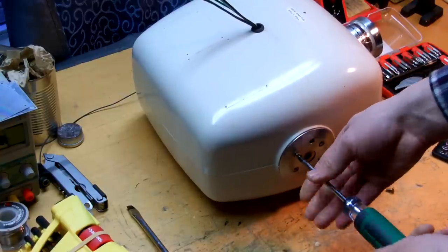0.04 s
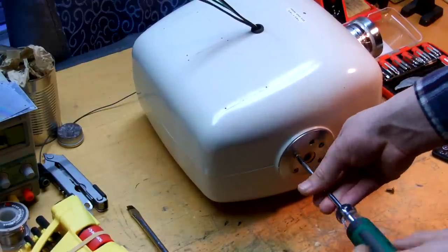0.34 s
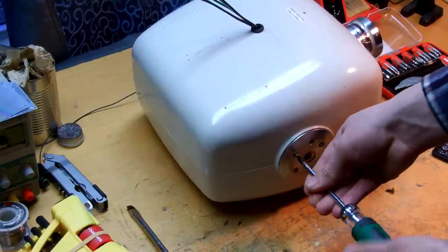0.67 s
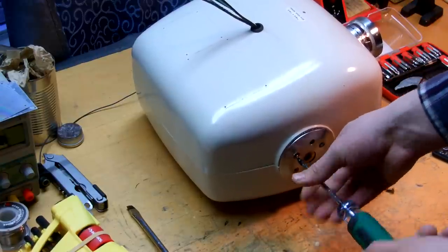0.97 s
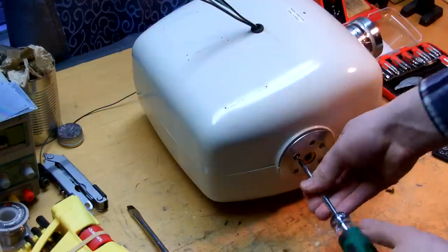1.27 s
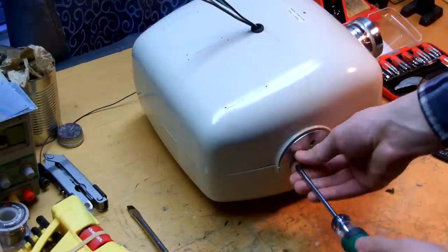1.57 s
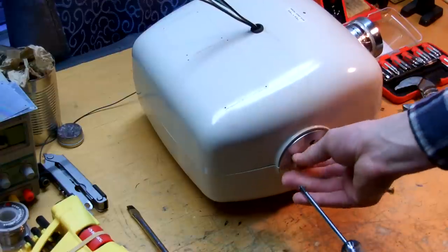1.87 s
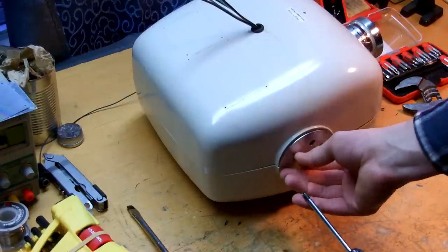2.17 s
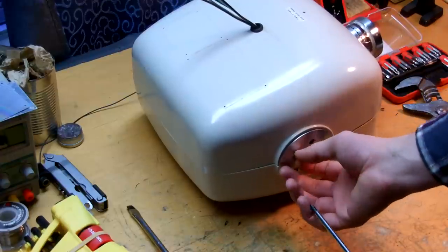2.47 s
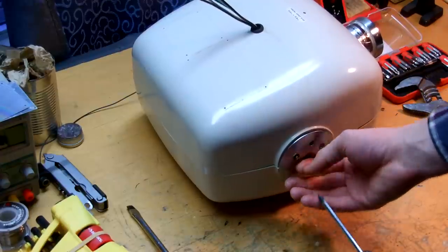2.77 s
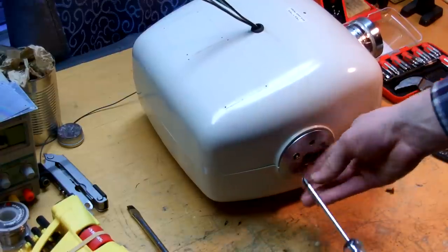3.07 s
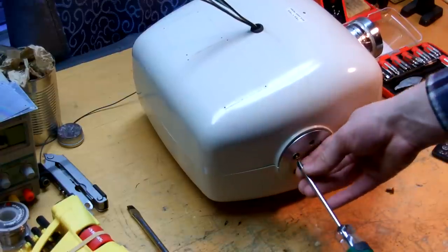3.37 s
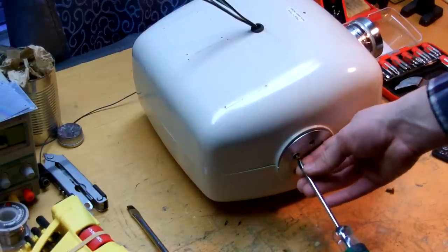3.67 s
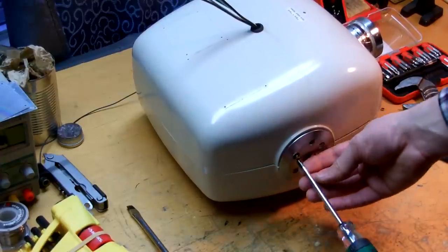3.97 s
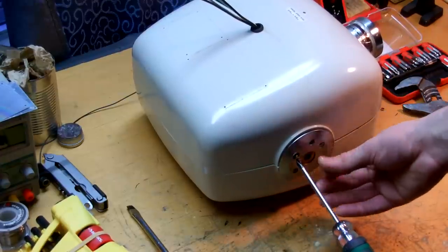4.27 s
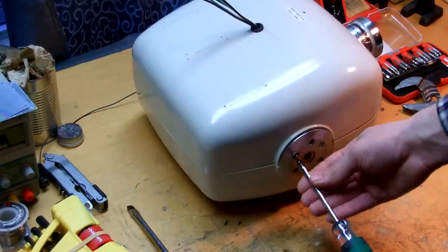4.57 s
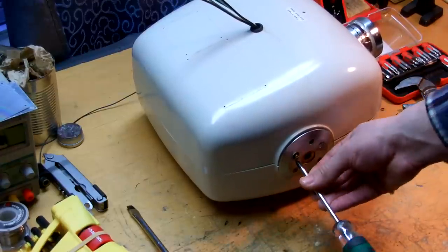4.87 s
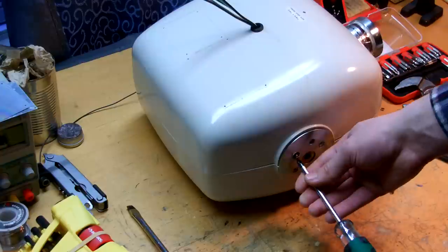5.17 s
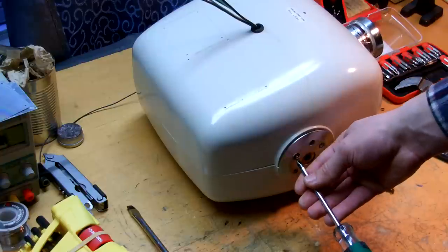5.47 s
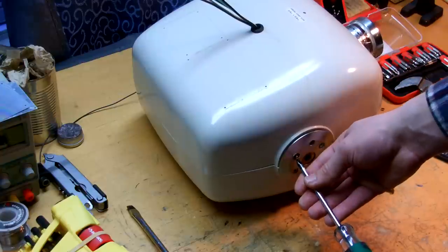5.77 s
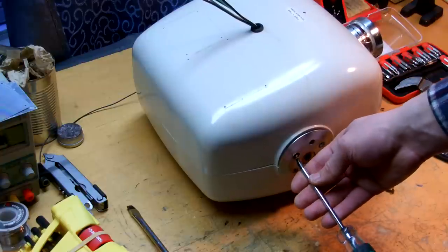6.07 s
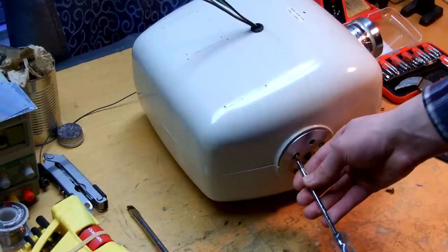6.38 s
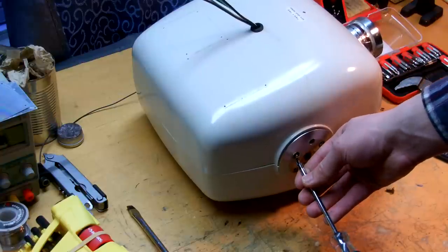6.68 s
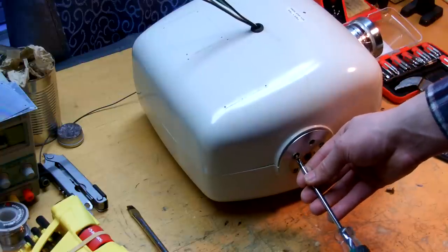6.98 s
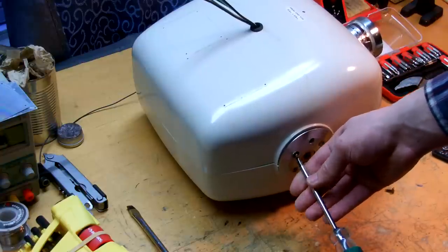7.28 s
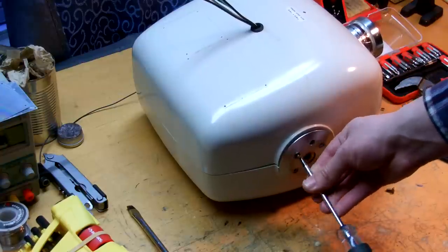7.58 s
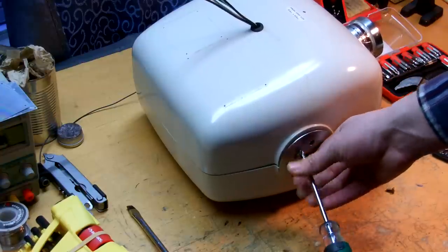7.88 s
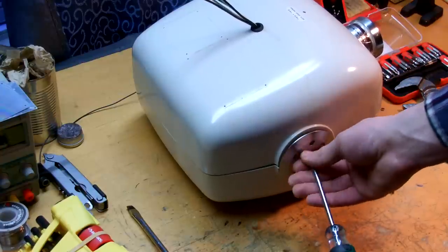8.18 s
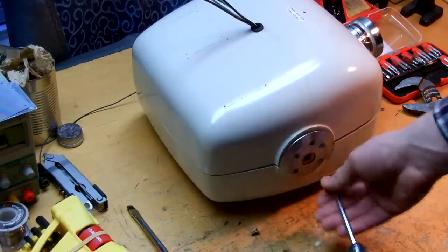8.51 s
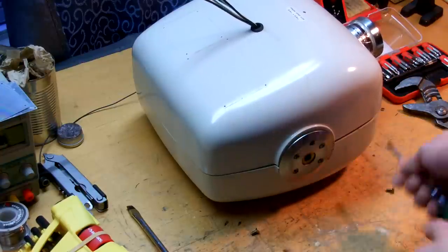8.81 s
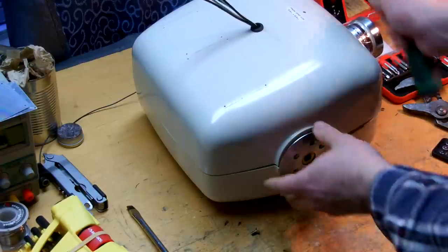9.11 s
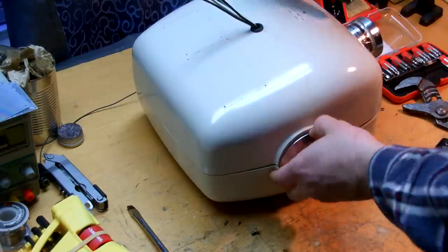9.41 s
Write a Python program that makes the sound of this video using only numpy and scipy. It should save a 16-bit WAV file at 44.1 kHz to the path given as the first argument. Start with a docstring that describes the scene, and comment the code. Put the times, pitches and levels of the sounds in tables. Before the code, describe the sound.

A hand screwdriver works small screws out of a metal plate on a hollow plastic housing, heard close in a small room with faint hiss. From about 0.5 seconds the blade rattles and knocks in the screw head, each contact sounding through the shell, with strong knocks near 1 and 1.4 seconds and brief squeaks from the thread. A quieter stretch from 2 to 3.3 seconds holds a few light metal chinks and a knock. Uneven clicks, knocks and short grating scrapes resume at 3.5 seconds, loudest near 4.5. The bench thuds dully at 6 seconds. More scraping and knocking runs from 7 to 8 seconds, ending in a thin metallic squeak. At 8.3 seconds a freed screw drops on the bench and bounces several times with bright clicks. Soft thuds and faint sleeve brushes follow, then a few last hollow knocks between 9.2 and 9.6 seconds.

```python
"""A hand screwdriver backs small screws out of a metal flange on a hollow plastic housing on a workbench.
In the hiss of a small quiet room a sleeve brushes by and the bench thuds dully. The blade rattles and
knocks in the screw heads, the thread squeaks and grates by stick-slip, and the housing booms with each
contact. From 2.2 s the shaft chinks on the flange a few times. The turning goes on until a freed screw
bounces on the bench at 8.3 s; dull thuds, brushes and a few last knocks follow."""
import sys
import numpy as np
from scipy import signal
from scipy.fft import rfft, irfft, next_fast_len
from scipy.io import wavfile

SR = 44100
rng = np.random.default_rng(int(sys.argv[2]) if len(sys.argv) > 2 else 0)


def materialize(psi):
    """Save the field psi as 16-bit PCM at rate SR to the path in sys.argv[1].

    A 1-D psi becomes a single channel; in a 2-D psi each row is a channel.
    """
    bounded = np.clip(np.atleast_2d(psi).T, -1, 1)
    quanta = np.round(bounded * 32767).astype(np.int16)
    wavfile.write(sys.argv[1], SR, quanta)


N = 425565
RING_S = np.arange(SR // 4) / SR  # time axis of one ring

# Steel shaft modes. Each row: frequency in Hz, relative level in dB, t60 in seconds.
SHAFT_MODES = [(4790, -3.5, 0.057), (7980, -4, 0.033), (8620, -3.5, 0.041), (13600, -8, 0.077)]
# Stereo width. Each row: frequency in Hz, side against mid in dB.
STEREO_WIDTH = [(100, -31), (300, -30), (1200, -18), (2400, -10.5), (4500, -9), (9000, -4), (15000, 0)]


def undb(db):
    """Decibels to gain."""
    return 10 ** (np.asarray(db) / 20)


def unit(x):
    """Scale to a mean energy of one per channel."""
    return x / np.sqrt(np.mean(np.sum(x ** 2, axis=-1)))


def fade(t60_s):
    """Exponential decay of a ring."""
    return np.exp(-np.log(1000) * RING_S / t60_s)


def colour(x, points):
    """Minimum-phase filter through (Hz, dB) points."""
    size = next_fast_len(x.shape[-1] // 2 + 2048) * 2
    hz, db = np.transpose(points)
    bin_hz = np.arange(size // 2 + 1) * SR / size
    gain = undb(np.interp(np.log(bin_hz + 1), np.log(hz), db))
    cepstrum = irfft(np.log(gain))
    cepstrum[1:size // 2] *= 2
    cepstrum[size // 2 + 1:] = 0
    return irfft(rfft(x, size) * np.exp(rfft(cepstrum)), size)[..., :x.shape[-1]]


def diffuse(count, width):
    """Stereo noise, wider towards the treble."""
    mid, side = rng.standard_normal((2, count))
    return mid + np.array([[1], [-1]]) * colour(side, width)


def butter(x, hz, kind="low", order=2):
    """Butterworth low-pass or high-pass."""
    return signal.sosfilt(signal.butter(order, min(hz, SR / 3), kind, fs=SR, output="sos"), x)


def add(out, start_s, sound):
    """Mix a sound in at start_s."""
    start = int(start_s * SR)
    out[:, start:start + sound.shape[1]] += sound[:, :N - start]


def modes(table, scatter_db, detune):
    """Decaying sines, weighted anew by each contact point."""
    hz, db, t60_s = np.transpose(table)[:, :, None]
    size, shift = rng.standard_normal((2, len(table), 1))
    sign = (-1) ** np.arange(len(table))[:, None]  # alternating signs let the ring build up
    sines = np.sin(2 * np.pi * hz * (1 + detune * shift) * RING_S)
    return unit(np.sum(sign * undb(db + scatter_db * size) * fade(t60_s) * sines, axis=0))


def cloud(t60_s):
    """Modes or reflections too dense to tell apart."""
    return unit(diffuse(len(RING_S), STEREO_WIDTH) * fade(t60_s))


def excite(response, slips):
    """A slip train played through a ring, at unit energy."""
    return unit(signal.fftconvolve(np.atleast_2d(response), slips[None], axes=1))


def room_tone(noise_db=-68.5, hum_hz=53, hum_db=-88):
    """Steady hiss over a faint rumble and hum."""
    # Each row: frequency in Hz, relative level in dB.
    spectrum = [(20, -24), (50, -5), (120, -11.5), (300, -1), (650, 1), (1200, -2.5), (2500, -5),
                (6000, -7.5), (15000, -8.5)]
    # Each row: frequency in Hz, side against mid in dB.
    width = [(60, -3.5), (200, -5), (1000, -1), (4000, 0)]
    noise = colour(diffuse(N, width), spectrum)
    hum = undb(hum_db) * np.sin(2 * np.pi * hum_hz * np.arange(N) / SR)
    return noise * undb(noise_db) / np.std(noise.mean(axis=0)) + hum


def brushes(grain_db=1.0):
    """Sleeve and skin slide in soft, grainy swells."""
    # Each row: centre in seconds, half length in seconds, level in dB.
    strokes = [(0.55, 0.62, -72), (2.97, 0.28, -72), (6.04, 0.091, -68.5), (7.47, 0.25, -69.5),
               (8.946, 0.1, -64.5), (9.418, 0.24, -69.5)]
    # Each row: frequency in Hz, relative level in dB.
    cloth_spectrum = [(100, -16), (500, 4.5), (1400, 0), (3000, -8.5), (7000, -11), (11000, -7),
                      (16000, -17)]
    t = np.arange(N) / SR
    swell = sum(undb(db) * np.exp(-((t - centre_s) / half_s) ** 2) for centre_s, half_s, db in strokes)
    grain = np.interp(t, np.linspace(0, t[-1], N // 256), rng.standard_normal(N // 256))
    friction = np.sqrt(N) * unit(colour(diffuse(N, STEREO_WIDTH), cloth_spectrum))
    return friction * swell * undb(-grain_db * grain)


def bench_thuds():
    """Low, dull thuds of the bench, some under hard knocks, some on their own."""
    # Each row: start in seconds, energy in dB, cut-off in Hz.
    thuds = [(0.043, -42, 246), (0.974, -40, 99), (1.406, -48, 100), (5.956, -31, 287), (5.99, -31.5, 85),
             (8.673, -35, 294), (8.936, -45.5, 179)]
    out = np.zeros((2, N))
    for start_s, db, cutoff_hz in thuds:
        thud = butter(cloud(t60_s=0.26) * (1 - fade(t60_s=0.026)), cutoff_hz, order=4)
        add(out, start_s, undb(db) * unit(butter(thud, 40, "high")))
    return out


def housing(cutoff_hz):
    """Hollow shell: clear low modes, a clack of dense upper ones, the room; soft contacts lack the top."""
    # Each row: frequency in Hz, relative level in dB, t60 in seconds.
    shell_modes = [(244.8, -28.5, 0.18), (301.7, -16, 0.12), (360.3, -19, 0.13), (399, -19.5, 0.16),
                   (446, -13.5, 0.083), (488, -15.0, 0.14), (514.4, -15.5, 0.088), (571, -24, 0.17),
                   (623, -11.5, 0.052), (697.2, -7.5, 0.11), (744, -15, 0.17), (836, -19.5, 0.14),
                   (907.4, -22, 0.18), (972.3, -11.5, 0.12), (1060, -9, 0.031), (1092, -14.5, 0.1),
                   (1231, -8.5, 0.052), (1268, -21.5, 0.069), (1298, -7, 0.071), (1390, -8, 0.08),
                   (1497, -18.5, 0.038), (1690, -7.5, 0.058), (1814, -9, 0.055), (2073, -7.5, 0.056),
                   (2184, -2, 0.053), (2552, -8.5, 0.1), (2800, -16.5, 0.11)]
    # Each row: frequency in Hz, relative level in dB.
    dense_spectrum = [(60, -35.5), (120, -36), (190, -24.5), (300, -14.5), (800, -9), (1300, -1), (1800, 1),
                      (2800, -1), (3900, -7.5), (7000, -11), (16000, -25)]
    clear = butter(modes(shell_modes, scatter_db=2.5, detune=0.003), 230, "high", order=4)
    clack = unit(cloud(t60_s=0.044) * (1 - fade(t60_s=0.011)))  # the blow takes a moment to spread
    room = undb(1) * cloud(t60_s=0.16)
    dense = unit(colour(clack + room, dense_spectrum))
    return butter(undb(-3) * clear + undb(1) * dense, cutoff_hz)


def steel():
    """Blade on screw head: a crack, a brief chatter, the room and the ringing shaft."""
    # Each row: frequency in Hz, relative level in dB.
    tick_spectrum = [(300, -24.5), (1200, -8.5), (3000, -4), (5200, 3.5), (7500, 0), (9000, 0.5),
                     (10500, -1), (13500, -0.5), (16000, -4)]
    crack = undb(-14) * (RING_S == 0)
    chatter = cloud(t60_s=0.029)
    room = undb(-8.5) * cloud(t60_s=0.17)
    tick = unit(colour(crack + chatter + room, tick_spectrum))
    return tick + undb(-11) * modes(SHAFT_MODES, scatter_db=1.5, detune=0.0099)


def contact(shell_db, steel_db, base_hz=2872, steel_db_per_octave=14.5, force_db_per_octave=47):
    """Housing and steel sound together; a stronger or steelier contact is shorter, so brighter."""
    hardness_db = min(steel_db - shell_db, -13)  # no harder beyond this share of steel
    octaves = hardness_db / steel_db_per_octave + shell_db / force_db_per_octave
    return undb(shell_db) * housing(base_hz * 2 ** octaves) + undb(steel_db) * steel()


def rattles(rate_hz=41, scatter_db=3.5):
    """The blade rattles unevenly in its slot while the fingers spin the shaft."""
    # Each row: start in seconds, end in seconds, mean housing level in dB.
    spins = [(0.495, 0.58, -28.5), (5.497, 5.66, -35.5), (6.098, 6.4, -37), (7.404, 7.57, -23)]
    out = np.zeros((2, N))
    for start_s, end_s, db in spins:
        for step_s in np.arange(start_s, end_s, 1 / rate_hz):
            shell_db = db + scatter_db * rng.standard_normal()
            add(out, step_s + rng.random() / rate_hz, contact(shell_db, steel_db=shell_db - 25))
    return out


def grate(length_s, shell_db, steel_db, slip_hz=420, scatter_db=6):
    """Stick-slip: an uneven run of tiny contacts that swells and dies."""
    count = max(int(length_s * slip_hz), 3)
    jitter, size = rng.standard_normal((2, 256))[:, :count]
    sign = rng.choice([-1, 1], 256)[:count]
    progress = (np.arange(count) + 0.5 + np.tanh(jitter) / 2) / count
    slips = np.zeros(int(length_s * SR) + 1)
    slips[(progress * length_s * SR).astype(int)] = np.sin(np.pi * progress) * undb(scatter_db * size) * sign
    return signal.fftconvolve(contact(shell_db, steel_db), unit(slips)[None])


def knocks(lead_s=0.018):
    """The blade grates up the side of its slot, then drops back in."""
    # Each row: impact time in seconds, housing level in dB, steel level in dB.
    impacts = [(0.585, -6, -20), (0.635, -4.5, -39), (0.9709, 8, 0.5), (0.992, 3.5, -15.5),
               (1.0722, 1, -33.5), (1.131, -4, -27.5), (1.2545, -3, -23), (1.3342, -13.5, -29),
               (1.3713, -6, -39.5), (1.4068, 7, -9), (2.035, -31.5, -40), (2.8031, -25.5, -18),
               (2.806, -9, -40.5), (2.974, -16, -59), (3.4602, -6, -30), (3.481, -13, -45),
               (3.602, -4, -28.5), (3.705, -14.5, -52.5), (3.744, -14, -40), (3.768, -18, -35.5),
               (4.0949, -5, -21), (4.194, 3.5, -17.5), (4.474, 9.5, -7), (4.628, -8.5, -15.5),
               (4.654, -11.5, -32.5), (4.919, -24.5, -44), (5.219, -7.5, -11.5), (5.353, -30, -40),
               (5.476, -19, -34.5), (5.5238, -14, -43.5), (5.683, -3.5, -22), (6.2374, -27.5, -43),
               (6.408, -20.5, -47), (6.615, -44, -36), (7.01, 5.5, -32), (7.3425, -25.5, -14),
               (7.602, -4.5, -25), (7.693, 0, -23.5), (7.733, -11, -37), (7.8344, 8.5, -9.5),
               (8.033, -21, -32), (9.249, -18.5, -34), (9.272, -5.5, -36.5), (9.483, -9.5, -46),
               (9.5626, -5.5, -45.5), (9.607, -2.5, -45.5)]
    out = np.zeros((2, N))
    for impact_s, shell_db, steel_db in impacts:
        lead_db = shell_db - 15
        add(out, impact_s - lead_s, grate(length_s=0.023, shell_db=lead_db, steel_db=lead_db - 25.5))
        add(out, impact_s, contact(shell_db, steel_db))
    return out


def squeaks(roughness=0.053, scatter_db=3.5):
    """The thread's slips fall into step, sing in the housing and keep the shaft ringing."""
    # Each row: start in seconds, length in seconds, slip rate in Hz, housing and shaft energies in dB.
    slip_runs = [(0.585, 0.09, 709.5, -18.5, -36), (1.366, 0.1, 1000, -15.5, -30),
                 (1.472, 0.063, 661.5, -11, -35), (5.255, 0.03, 498.5, -16, -42),
                 (7.68, 0.015, 689, -12, -33), (8.042, 0.055, 721, -20.5, -19.5),
                 (8.15, 0.014, 488, -30, -58), (8.785, 0.073, 558, -38, -54)]
    out = np.zeros((2, N))
    for start_s, length_s, slip_hz, shell_db, shaft_db in slip_runs:
        jitter, size = rng.standard_normal((2, 128))
        times_s = np.cumsum(np.abs(1 + roughness * jitter)) / slip_hz
        force = np.sin(np.pi * times_s / length_s) * undb(scatter_db * size)
        inside = times_s < length_s
        slips = np.zeros(int(length_s * SR) + 1)
        slips[(times_s[inside] * SR).astype(int)] = force[inside]
        shaft = excite(modes(SHAFT_MODES, scatter_db=12, detune=0.0055), slips)
        shell = excite(housing(cutoff_hz=605), slips)
        add(out, start_s, undb(shell_db) * shell + undb(shaft_db) * shaft)
    return out


def scrapes():
    """The thread grates as the screw turns."""
    # Each row: start in seconds, length in seconds, housing level in dB, steel level in dB.
    turns = [(0.64, 0.04, -11, -41), (1.464, 0.044, -11.5, -29), (3.573, 0.03, -6, -34),
             (4.687, 0.099, -12, -32.5), (5.236, 0.054, -3.5, -29.5), (5.388, 0.072, -13.5, -32.5),
             (6.964, 0.069, -12, -36), (7.19, 0.27, -14.5, -55), (7.548, 0.13, -7, -36),
             (7.717, 0.095, -13, -39), (8.045, 0.038, -17, -12), (9.577, 0.024, -24, -25.5)]
    out = np.zeros((2, N))
    for start_s, length_s, shell_db, steel_db in turns:
        add(out, start_s, grate(length_s, shell_db, steel_db))
    return out


def chinks():
    """Light touches of the shaft ring the small metal flange."""
    # Each row: start in seconds, energy in dB.
    touches = [(2.212, -39), (2.801, -26.5), (2.884, -43), (3.153, -45)]
    # Each row: frequency in Hz, relative level in dB, t60 in seconds.
    flange_modes = [(2280, -5, 0.034), (2844, 6.5, 0.036), (3100, -2, 0.035), (3500, 0, 0.022)]
    out = np.zeros((2, N))
    for start_s, db in touches:
        add(out, start_s, undb(db) * modes(flange_modes, scatter_db=-6.5, detune=0.0194)[None])
    return out


def falling_screw():
    """Each bounce is a hard click, a short rap of the bench top and the room's answer."""
    # Each row: start in seconds, level in dB.
    bounces = [(8.261, -1), (8.3316, -8), (8.3808, -15), (8.4016, -21), (8.422, -39), (8.494, -22.5),
               (8.5148, -29)]
    # Each row: frequency in Hz, relative level in dB.
    spectrum = [(200, -38), (600, -12), (1500, -3), (2400, 1), (4000, -1.5), (6000, 2), (7800, 3),
                (9300, 7), (10600, 5), (12000, 0.5), (13500, -5), (16000, -22)]
    out = np.zeros((2, N))
    for start_s, db in bounces:
        click = unit(colour(undb(5) * (RING_S == 0) + cloud(t60_s=0.0055), spectrum))
        bench = cloud(t60_s=0.071)
        room = undb(-7) * cloud(t60_s=0.2)
        rap = unit(butter(colour(bench + room, spectrum), 3600, order=1))
        add(out, start_s, undb(db) * (click + undb(-0.5) * rap))
    return out


def scene():
    """Everything at the bench, in stereo."""
    screwdriver = knocks() + scrapes() + squeaks() + chinks()
    return screwdriver + falling_screw() + bench_thuds() + brushes() + room_tone() + rattles()


def record(dry):
    """Steep low-pass at 15.5 kHz."""
    return signal.sosfilt(signal.ellip(8, 0.2, 70, 15500, fs=SR, output="sos"), dry)


dry = scene()
out = record(dry)
materialize(out)
```